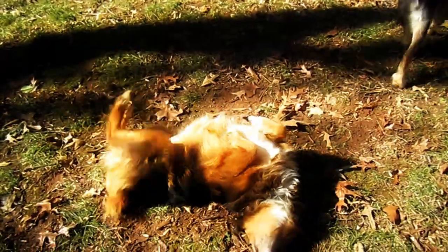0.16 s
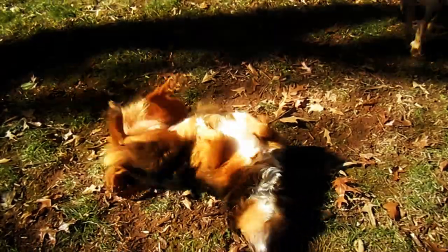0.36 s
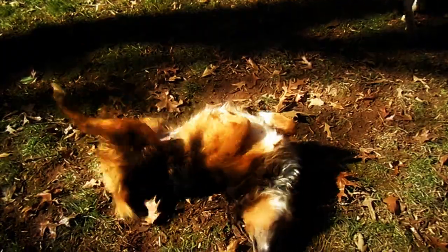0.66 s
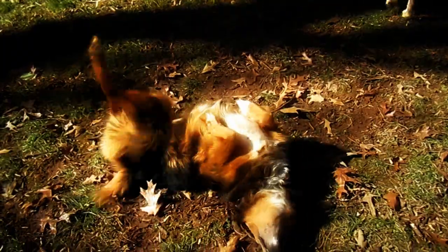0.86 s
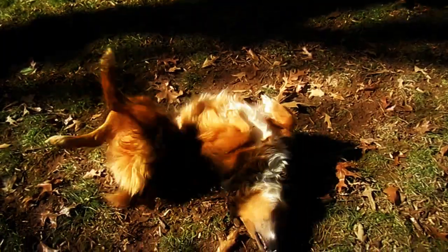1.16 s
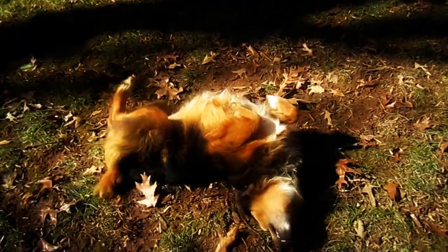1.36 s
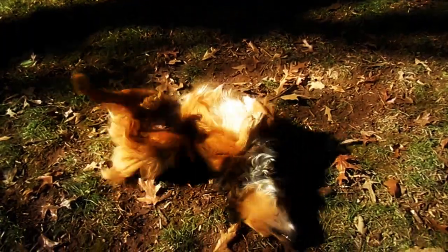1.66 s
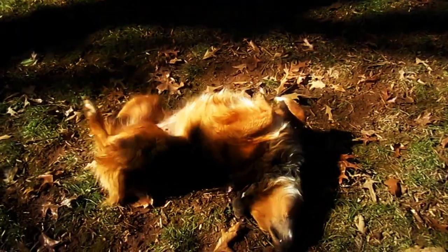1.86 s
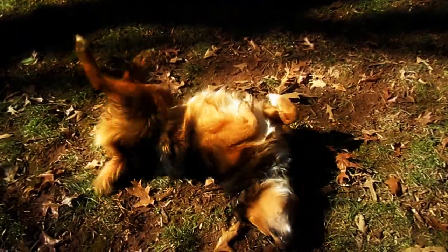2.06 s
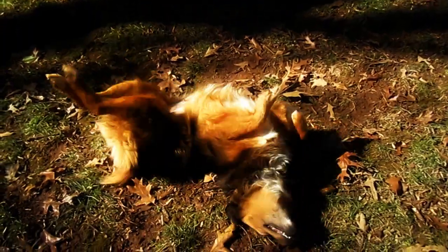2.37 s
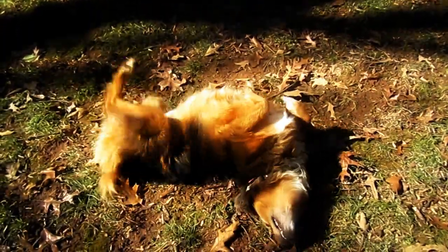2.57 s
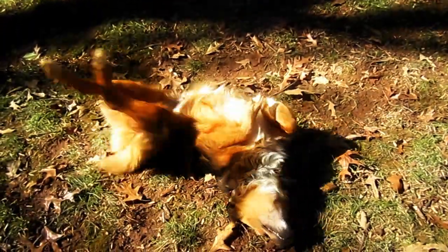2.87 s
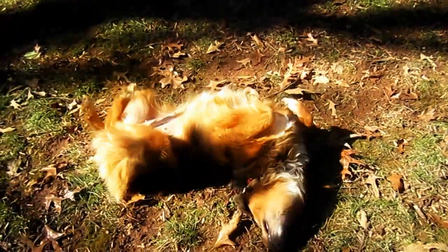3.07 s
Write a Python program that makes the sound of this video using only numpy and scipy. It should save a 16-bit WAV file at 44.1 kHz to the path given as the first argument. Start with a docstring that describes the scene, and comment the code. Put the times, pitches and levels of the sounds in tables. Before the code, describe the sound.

A dog growls five times in short, rough bursts, close to the microphone outdoors, with hollow jaw clacks and quick gasps between growls, dry leaves crackling beneath and faint collar tags tinkling, clearest at the end.

```python
"""A dog rolls on its back in dry leaves, close to a camera outdoors.
From the start, filtered noise makes a far hush and random clicks make the leaves crackle and snap.
Damped tones make the first jaw clacks, then pulses and puffs through resonances make five rough growls.
Between growls come gasps of filtered noise and more clacks.
From the end of the second growl on, damped high tones make the collar tags tinkle, most near the end."""
import sys
import numpy as np
from scipy import signal
from scipy.io import wavfile
from scipy.ndimage import uniform_filter1d

SR = 44100
rng = np.random.default_rng(int(sys.argv[2]) if len(sys.argv) > 2 else 0)


def waveform_to_disk(signal):
    """Save audio, clipped to [-1, 1], as 16-bit WAV at the path in sys.argv[1]."""
    frames = np.transpose(np.atleast_2d(signal))
    scaled = np.clip(frames, -1, 1) * 32767
    samples = np.round(scaled).astype(np.int16)
    wavfile.write(sys.argv[1], SR, samples)


N = 141120  # samples, 3.2 s

# Far hush: (f/Hz, level/dB per Hz), only the shape counts
HUSH_SPECTRUM = [(12, -32), (20, -31), (93, 9), (202, -1), (373, -6.5), (454, -5.5), (536, -5.5),
                 (617, -4.5), (911, -8), (1050, -12), (2480, -20), (3380, -25), (4990, -24.5), (11800, -29),
                 (15600, -41)]
HUSH_DB, PATCH_DB = -44.5, 1.5

# Leaf rustle over time: (t/s, level/dB before RUSTLE_GAIN_DB is added)
RUSTLE = [(0.0, -47), (0.07, -54), (0.16, -56), (0.2, -57.5), (0.33, -58.5), (0.35, -55), (0.56, -60),
          (0.59, -44.5), (0.68, -59.5), (1.02, -58.5), (1.09, -50.5), (1.1, -56.5), (1.28, -63),
          (1.3, -43.5), (1.36, -68), (1.38, -39.5), (1.43, -47.5), (1.52, -44), (1.53, -51), (1.8, -54.5),
          (1.82, -62), (1.83, -54.5), (2.13, -57), (2.16, -50), (2.18, -62.5), (2.27, -45.5), (2.29, -52.5),
          (2.78, -54.5), (2.8, -50), (2.92, -54.5), (3.03, -55), (3.07, -59.5), (3.1, -53.5), (3.2, -80)]
# Colour of the leaves: (f/Hz, level/dB per Hz), only the shape counts
LEAF_SPECTRUM = [(530, -32), (900, 0), (1030, -8), (1210, 1), (2340, -6.5), (3160, 0), (4050, -2.5),
                 (4410, 1.5), (9700, -7.5), (15600, -18.5)]
# Loudest leaf snaps: (t/s, level/dB before SNAP_TRIM_DB is added)
LOUD_SNAPS = [(0.0548, -46), (0.2042, -38), (0.4599, -38.5), (0.593, -37), (0.6389, -47), (0.801, -39.5),
              (1.299, -40), (1.3442, -37.5), (1.488, -30.5), (1.515, -28), (2.5741, -38), (3.005, -38),
              (3.135, -41), (3.152, -42.5), (3.156, -45), (3.162, -47)]
RUSTLE_GAIN_DB, SNAP_TRIM_DB = 5, -0.5
CRACKLES_PER_S, CRACKLE_SPREAD_DB = 820, 4
SWISH = 0.73  # steady noise beside a crackle of strength 1
SNAP_DECAY_S = 0.0046  # time to fall to 37 %

# Jaw clacks: (t/s, main ring level/dB, f/Hz, time to fall 60 dB/s, thump level/dB against the ring)
CLACKS = [(0.145, -19, 686, 0.025, -31), (0.157, -29.5, 600, 0.02, 3), (0.165, -27.5, 630, 0.025, 4.5),
          (0.708, -16, 672, 0.023, -32), (0.733, -12, 731, 0.031, -18.5), (1.315, -26.5, 473, 0.03, -8),
          (1.327, -28, 520, 0.036, 2.5), (2.28, -29, 390, 0.017, -6), (2.284, -19.5, 470, 0.016, -17),
          (2.301, -25.5, 450, 0.018, -10)]
THUMP_HZ, THUMP_T60_S = 212, 0.025
TICK_DB = -23  # noise tick against the main ring

# One table per growl: (t/s, pitch f/Hz, chest level/dB,
# then mouth, palate and breath level/dB, each against the chest)
GROWLS = [
    [(0.235, 134.5, -43, -15, -32, -25), (0.245, 134.3, -33, 0.5, -20, -24),
     (0.289, 140.8, -27.5, -3.5, -42, -25), (0.321, 141.9, -43, 7, -24, -37),
     (0.339, 138.1, -21.5, -12, -27, -23), (0.387, 143.6, -27.5, -1, -16.5, -29),
     (0.419, 141.5, -30, -2.5, -24, -29), (0.457, 153.9, -25, -4.5, -23.5, -30),
     (0.521, 150.4, -28.5, -4.5, -24, -38), (0.541, 147.2, -32, 4, -19, -13),
     (0.571, 135.5, -24, -12.5, -27, -43), (0.593, 136.5, -32, -5, -21, -14),
     (0.625, 133, -51, -19, -11, 0)],
    [(0.805, 150.4, -36, -2, -24, -21), (0.827, 146.4, -29.5, 0.5, -15, -18),
     (0.879, 140.1, -32, 2, -18, -18), (0.917, 146.4, -32, 2, -17, -26),
     (0.949, 140.4, -26, -2.5, -24, -26), (0.977, 140, -27, -6.5, -22, -23.5),
     (1.077, 150.2, -27.5, -5.5, -22.5, -28), (1.121, 147, -27, -2.5, -26, -49),
     (1.129, 150.3, -32.5, 1.5, -18, -26), (1.151, 154.8, -25.5, -4, -26, -36),
     (1.185, 185.7, -28, -3.5, -25, -31), (1.201, 188.4, -37.5, -27, -10.5, -10.5),
     (1.215, 190.2, -48, -12, -20, -11)],
    [(1.352, 181.7, -33, -30, -22, -22), (1.374, 177.2, -28, 8, 0.5, -8), (1.4, 162.4, -27.5, 10, 2.5, -8),
     (1.426, 166.3, -26.5, 2.5, -4, -10), (1.458, 157.2, -25, 2, -4, -16),
     (1.512, 158.6, -26.5, 2, -5, -19), (1.55, 161.1, -24, -5.5, -20.5, -31),
     (1.578, 177.8, -24, -5, -14.5, -54), (1.612, 210.9, -24, -9.5, -14, -28),
     (1.626, 215.7, -22.5, -6, -24, -34), (1.732, 220.2, -25.5, -3, -28, -27.5),
     (1.762, 215.3, -27.5, -4, -24, -34), (1.785, 222, -42, -4, -15, -7)],
    [(1.955, 157.9, -40, 1, -27, -16), (1.969, 155.2, -38, 3.5, -19, -27),
     (1.979, 153.3, -34, -1.5, -14, -19), (2.001, 147, -31.5, 3, -21, -33),
     (2.013, 141.7, -38, -4, -34, -37), (2.025, 136.3, -34, -19, -35, -34),
     (2.035, 136.2, -32, -7, -27, -10), (2.045, 136.5, -34.5, -4, -21, -37),
     (2.087, 147, -29.5, -8.5, -25, -24), (2.117, 156.1, -34.5, -2.5, -22, -19),
     (2.151, 157.4, -27.5, 1.5, -21, -15), (2.175, 153, -36.5, -9, -23, -16),
     (2.185, 158.9, -41, 4, -13, 5)],
    [(2.35, 154.8, -34, 1, -23, -29), (2.368, 155.8, -26, 1.5, -10.5, -16.5),
     (2.41, 180.1, -25.5, 2, -16.5, -18.5), (2.49, 184, -25.5, 1, -22, -17),
     (2.562, 196.5, -20.5, -1, -20.5, -17.5), (2.602, 200.8, -25, -3, -24, -18),
     (2.652, 151.4, -26, -6.5, -25, -30.5), (2.786, 139.6, -24.5, -6, -30.5, -29.5),
     (2.878, 159.1, -25.5, -0.5, -27, -20.5), (2.898, 160.1, -23.5, -4.5, -28, -25),
     (2.948, 205.5, -21.5, -10, -39, -23.5), (2.988, 208, -26, -10.5, -26, -27),
     (3.003, 206.7, -55, -14, -11, -17)],
]
# How unevenly the vocal folds beat: (t/s, roughness from 0 to 1)
ROUGHNESS = [(.24, .25), (.32, .35), (.36, .6), (.55, .55), (.62, .4), (.81, .25), (.95, .35), (1.05, .55),
             (1.2, .4), (1.36, .13), (1.44, .15), (1.52, .3), (1.66, .6), (1.72, .8), (1.79, .8),
             (1.96, .1), (2.03, .15), (2.07, .6), (2.12, .2), (2.18, .15), (2.36, .45), (2.45, .6),
             (2.6, .7), (2.66, .45), (2.75, .7), (2.85, .45), (2.95, .45)]
# Jaw and tongue move the resonances: (t/s, mouth stretch factor, low palate f/Hz, high palate f/Hz,
# first breath f/Hz)
JAW = [(.24, 1.15, 1270, 1940, 3430), (.36, 1.07, 1190, 2240, 3230), (.5, 1.01, 1310, 2120, 3280),
       (0.601, 0.98, 1300, 2100, 3070), (.82, 1.036, 1380, 2000, 3000), (1.0, 1.04, 1280, 1777, 2950),
       (1.19, 1.02, 1280, 1900, 3050), (1.37, 0.99, 1550, 1840, 2830), (1.41, 1.07, 1590, 1935, 2730),
       (1.46, 0.99, 1350, 1960, 2930), (1.52, 0.93, 1290, 1870, 3120), (1.6, 0.96, 1340, 1990, 3210),
       (1.77, 0.89, 1292, 1930, 3020), (1.97, 0.99, 1280, 1900, 3300), (2.17, 0.92, 1230, 1850, 3230),
       (2.37, 0.93, 1420, 1760, 3020), (2.43, 0.96, 1450, 1940, 3160), (2.49, 0.91, 1370, 2100, 3130),
       (2.57, 1.04, 1450, 2010, 2970), (2.65, 0.96, 1310, 2000, 3100), (2.721, 0.9, 1360, 1900, 3230),
       (2.85, 1.15, 1240, 1937, 3620), (2.979, 1.01, 1185, 2030, 3420)]
# Chest resonances: (f/Hz, width/Hz, level/dB within the band)
CHEST = [(162.8, 115, 1), (250.2, 78, 3)]
# Mouth resonances: (f/Hz before the jaw stretch, width/Hz, level/dB within the band)
MOUTH = [(442.2, 120, 6), (587, 133, 2.5), (707, 172, 2), (944, 400, -14.5)]
# Low and high palate resonance, placed by JAW: (width/Hz, level/dB within the band)
PALATE = [(260, 12.5), (280, 8.5)]
# Breath resonances: (f/Hz, width/Hz, level/dB within the band); JAW replaces the first f
BREATH = [(3146, 610, 7.5), (4790, 380, 4), (5930, 1200, 0), (7500, 400, -8.5)]
# Random flare of the resonances: level/dB for chest, mouth, palate, breath
FLARE_DB = [1.5, 2., 3., 4.]
# Power share of puffed air at half roughness, 0 to 1: chest, mouth, palate, breath
AIR_SHARE = [.15, .3, .45, .75]
# These three grow with roughness; the values hold at roughness 1
JITTER_CYCLES, SHIMMER_DB, FLUTTER_DB = 0.2, 3.0, 4
FLUTTER_HZ = 27.52  # average rate, it wanders
PUFF_CYCLES = 0.35  # part of a cycle in which a puff falls to 37 %
REOPEN_CYCLES, REOPEN_DB = 0.447, -9  # opposite pulse as the folds part, level at half roughness
GROWL_FADE_S = 0.012

# Gasps, one table each: (t/s, level/dB)
GASPS = [
    [(0.62, -51), (0.624, -51), (0.736, -44), (0.796, -57), (0.8, -57)],
    [(1.23, -72), (1.24, -49), (1.296, -37), (1.326, -34), (1.35, -59)],
    [(2.24, -76), (2.282, -40.5), (2.292, -68), (2.302, -38), (2.34, -60)],
]
# Resonances of drawn air: (f/Hz, width/Hz, level/dB before the gasp is evened)
GASP_RESONANCES = [(1250, 1370, 11), (3220, 650, 13), (5340, 1800, 0.67)]

# Ringing modes of the collar tags: (f/Hz, level/dB, time to fall 60 dB/s)
TAG_MODES = [(4285, 0, 0.14), (6910, -1.5, 0.078), (10150, -3.5, 0.046), (12800, -17, .07)]
# Tag knocks: (t/s, level/dB, free ringing/s until fur damps it, tilt/dB per octave upwards)
JINGLES = [(1.208, -52.5, .012, 10), (1.816, -54, .01, 14), (2.701, -63, .012, 7), (3.092, -38, 0.02, -7),
           (3.097, -52.5, .012, 11), (3.113, -49, 0.0064, 8), (3.132, -53, .007, 8),
           (3.152, -50, 0.0052, 5)]
FUR_DECAY_S, MODE_SPREAD_DB = 0.0015, 1.1

TOP_HZ = 15800  # upper limit of the camera's sound


def amp(db):
    """Turns decibels into a factor."""
    return 10 ** (np.asarray(db) / 20)


def evened(x):
    """Scales x to an average (RMS) strength of 1."""
    return x / np.sqrt(np.mean(x ** 2) + 1e-20)


def add(mix, start_s, sound):
    """Adds a sound to the mix at its start time."""
    part = mix[round(start_s * SR):][:len(sound)]
    part += sound[:len(part)]


def curve(rows, t):
    """Draws straight lines between the points of a (time, value) table."""
    times, values = np.transpose(rows)
    return np.interp(t, times, values)


def coloured(x, spectrum):
    """Gives x the spectrum with a filter that only rings after its input."""
    hz = np.abs(np.fft.fftfreq(4096, 1 / SR))
    f, db = np.transpose(spectrum)
    log_gain = np.interp(np.log(hz + 1), np.log(f + 1), db) * np.log(10) / 20
    response = np.exp(np.conj(signal.hilbert(log_gain)))
    taps = np.fft.ifft(response).real[:2048]
    return signal.oaconvolve(x, taps)[:len(x)]


def ring(hz, t60, length=.25):
    """A struck object's tone, falling 60 dB in t60 seconds."""
    t = np.arange(0, length, 1 / SR)
    return amp(-60 * t / t60) * np.sin(2 * np.pi * hz * t)


def resonate(x, hz, width):
    """Two-stage resonance of gain 1, at a fixed frequency or following a curve."""
    turn = np.exp(2j * np.pi * np.cumsum(hz * np.ones(len(x))) / SR)
    r = np.exp(-np.pi * width / SR)
    # Shift the resonance down to 0 Hz, smooth there, then shift back
    low = signal.lfilter([(1 - r) ** 2], [1, -2 * r, r * r], x / turn)
    return 2 * (turn * low).real


def tract(x, peaks, flare_db=0):
    """Sums resonances of alternating sign, each flaring between 40 random levels a second."""
    steps = np.arange(len(x)) * 40 / SR
    out = np.zeros(len(x))
    for k, (hz, width, db) in enumerate(peaks):
        flare = np.interp(steps, np.arange(40), rng.standard_normal(40))
        out += (-1) ** k * amp(db + flare_db * flare) * resonate(x, hz, width)
    return out


def hush():
    """Distant outdoor noise: a shaped spectrum with soft patches drifting in time and pitch."""
    frames, hz = N // 256 + 5, np.fft.rfftfreq(1024, 1 / SR)
    real, imag, patches = rng.standard_normal((frames, 513, 3)).T
    patches = uniform_filter1d(patches, 10, 0)  # across frequency
    patches = evened(uniform_filter1d(patches, 12, 1))  # across time
    f, db = np.transpose(HUSH_SPECTRUM)
    level_db = np.interp(np.log(hz + 1), np.log(f + 1), db)[:, None] + PATCH_DB * patches
    noise = signal.istft((real + 1j * imag) * amp(level_db), nperseg=1024, noverlap=768)[1][:N]
    return amp(HUSH_DB) * evened(noise)


def leaves():
    """Dry leaves swish and crackle with the rolling, as noise and tiny bursts; a few snap loudly."""
    t = np.arange(N) / SR
    spread_db = CRACKLE_SPREAD_DB * np.minimum(rng.exponential(1, N), 4)
    clicks = amp(spread_db) * (rng.random(N) < CRACKLES_PER_S / SR)
    bursts = signal.oaconvolve(clicks, np.exp(-np.arange(200) / 30))[:N]
    crackle = evened(bursts * rng.standard_normal(N))
    rustle = evened(coloured(crackle + SWISH * rng.standard_normal(N), LEAF_SPECTRUM))
    out = amp(RUSTLE_GAIN_DB + curve(RUSTLE, t)) * rustle
    decay = np.exp(-t[:900] / SNAP_DECAY_S)
    for start_s, db in LOUD_SNAPS:
        snap = evened(coloured(rng.standard_normal(900), LEAF_SPECTRUM))
        add(out, start_s, amp(db + SNAP_TRIM_DB) * decay * snap)
    return out


def jaw_clacks():
    """Each clack is a short damped tone with a low thump and a tiny noise tick."""
    out = np.zeros(N)
    for start_s, db, hz, t60, thump_db in CLACKS:
        thump = amp(thump_db) * ring(THUMP_HZ, THUMP_T60_S)
        tick = amp(TICK_DB) * rng.standard_normal(60) * np.exp(-np.arange(60) / 15)
        add(out, start_s, amp(db) * (ring(hz, t60) + thump))
        add(out, start_s, amp(db) * tick)
    return out


def fold_beats(t, pitch_hz, rough):
    """Vocal folds beat unevenly, giving sharp pulses and, in each cycle, a fading puff of air."""
    chance = rng.standard_normal((200, 2))  # per cycle: timing, strength
    even = np.cumsum(pitch_hz) / SR
    turns = even + JITTER_CYCLES * rough * np.interp(even, np.arange(200), chance[:, 0])
    cycle = np.clip(np.floor(turns).astype(int), 0, 199)
    # The flutter's speed wanders around its average
    speed = 1 + 2.4 * uniform_filter1d(rng.standard_normal(len(t)), 900)
    flutter = np.cos(2 * np.pi * FLUTTER_HZ * np.cumsum(speed) / SR)
    strength = amp(rough * (SHIMMER_DB * chance[cycle, 1] + FLUTTER_DB * flutter))
    parting = np.floor(turns - REOPEN_CYCLES)
    closing_pulses = np.diff(cycle, prepend=cycle[0]) > 0
    opening_pulses = np.diff(parting, prepend=parting[0]) > 0
    beats = evened(closing_pulses - 2 * rough * amp(REOPEN_DB) * opening_pulses) * strength
    puffs = np.exp(-(turns % 1) / PUFF_CYCLES) * rng.standard_normal(len(t))
    return beats, evened(puffs) * strength


def mouth_shape(t):
    """Jaw and tongue shift the resonances; gives the peaks of chest, mouth, palate and breath."""
    times, *jaw = np.transpose(JAW)
    stretch, low_hz, high_hz, breath_hz = (np.interp(t, times, column) for column in jaw)
    mouth = [(f * stretch, width, db) for f, width, db in MOUTH]
    palate = [(low_hz, *PALATE[0]), (high_hz, *PALATE[1])]
    breath = [(breath_hz, *BREATH[0][1:])] + BREATH[1:]
    return CHEST, mouth, palate, breath


def growl(rows):
    """Fold pulses and puffs drive four bands of resonances, each held to its own level curve."""
    s, hz, chest_db, *above_db = np.transpose(rows)
    t = np.arange(s[0], s[-1], 1 / SR)
    rough = curve(ROUGHNESS, t)
    beats, puffs = fold_beats(t, np.interp(t, s, hz), rough)
    out = np.zeros(len(t))
    relative_db = [0 * s] + above_db
    for peaks, rel_db, share, flare_db in zip(mouth_shape(t), relative_db, AIR_SHARE, FLARE_DB):
        air = np.clip(share * 2 * rough, 0, 1)
        drive = np.sqrt(1 - air) * beats + np.sqrt(air) * puffs
        band = tract(drive, peaks, flare_db)
        band = band / np.sqrt(uniform_filter1d(band ** 2, 4000) + 1e-12)  # even out over 91 ms
        out += band * amp(np.interp(t, s, chest_db + rel_db))
    # The microphone's low cut thins the deep bass below the growl's pitch
    out = signal.sosfilt(signal.butter(2, 90, "high", fs=SR, output="sos"), out)
    fade = np.clip(np.minimum(t - s[0], s[-1] - t) / GROWL_FADE_S, 0, 1)
    return s[0], -out * fade


def growls():
    """Places the five growls, each with its own folds and mouth movement."""
    out = np.zeros(N)
    for rows in GROWLS:
        add(out, *growl(rows))
    return out


def gasps():
    """The dog draws air: noise through broad resonances, swelling and fading."""
    out = np.zeros(N)
    for rows in GASPS:
        t = np.arange(rows[0][0], rows[-1][0], 1 / SR)
        air = evened(tract(rng.standard_normal(len(t)), GASP_RESONANCES))
        add(out, t[0], air * amp(curve(rows, t)) * signal.windows.tukey(len(t), .2))
    return out


def collar_tags():
    """Each knock rings the tag modes, duller or brighter, until fur damps them."""
    out, t = np.zeros(N), np.arange(0, .25, 1 / SR)
    for start_s, db, held_s, tilt_db in JINGLES:
        knock = np.zeros(len(t))
        for hz, mode_db, t60 in TAG_MODES:
            octaves = np.log2(hz / TAG_MODES[0][0])
            chance_db = MODE_SPREAD_DB * rng.standard_normal()
            knock += amp(mode_db + tilt_db * octaves + chance_db) * ring(hz, t60)
        damping = np.exp(-np.maximum(t - held_s, 0) / FUR_DECAY_S)
        add(out, start_s, amp(db) * knock * damping)
    return out


def scene():
    """Adds all the layers into one channel."""
    return (hush() + leaves() + jaw_clacks() + growls() + gasps() + collar_tags())[None]


def record(dry):
    """The camera's band limit: a steep filter removes the highest treble."""
    lowpass = signal.firwin(511, TOP_HZ, window=("kaiser", 9), fs=SR)
    return signal.oaconvolve(dry, lowpass[None], "same")


dry = scene()
out = record(dry)
waveform_to_disk(out)
```